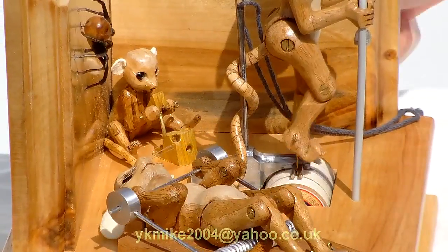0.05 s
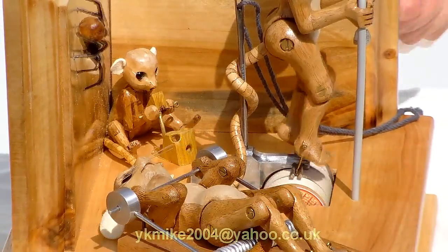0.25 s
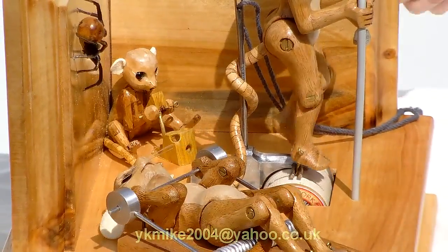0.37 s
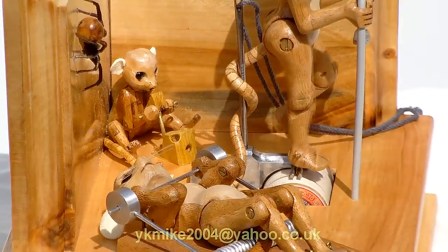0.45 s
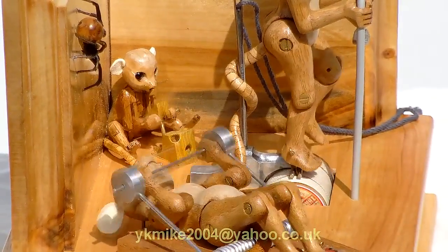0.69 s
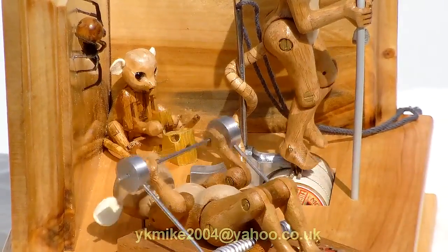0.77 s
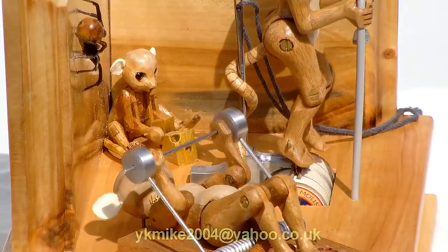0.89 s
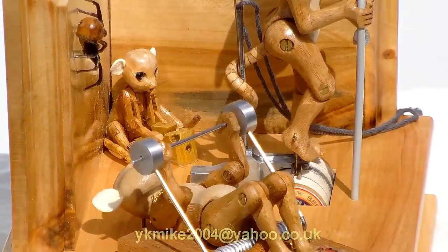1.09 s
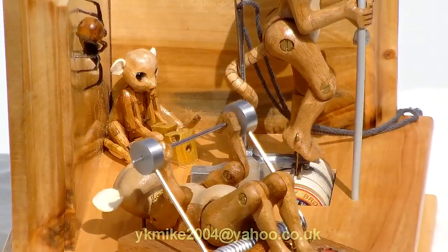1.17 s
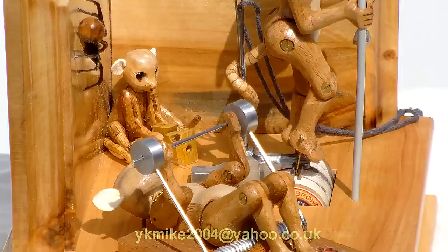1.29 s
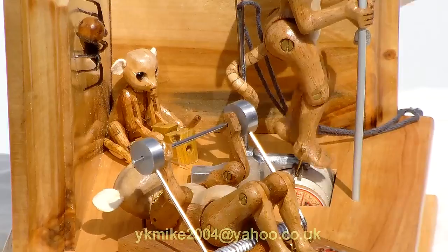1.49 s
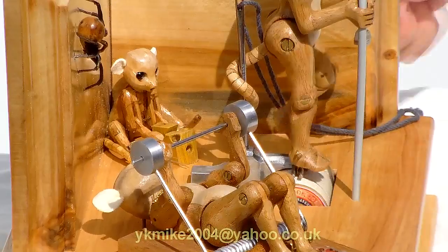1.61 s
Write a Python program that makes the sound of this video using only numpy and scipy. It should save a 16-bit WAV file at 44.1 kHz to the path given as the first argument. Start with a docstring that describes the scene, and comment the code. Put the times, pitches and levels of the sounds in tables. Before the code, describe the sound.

A small hand-cranked wooden automaton clicks and clacks unevenly, with soft wood rubbing, thin metallic pings and two brief rod rings; close microphone, small room, faint steady hiss.

```python
"""Wood rubs softly over a faint hiss, then the parts of a hand-cranked wooden automaton begin to click.
The rubbing is many tiny random slips; each click is a burst of noise split into ranges of pitch.
A thin ping recurs, a metal rod rings twice and small parts sound short notes, all made of sine waves.
A small room answers the clicks and notes with near reflections and short tails of fading noise."""
import sys
import numpy as np
from scipy import signal
from scipy.fft import rfft, irfft
from scipy.io import wavfile

SR = 44100
rng = np.random.default_rng(int(sys.argv[2]) if len(sys.argv) > 2 else 0)


def log_audio(samples):
    """Write samples as a 16-bit WAV file to the path given in sys.argv[1]."""
    # one column per channel
    frames = np.atleast_2d(samples).T
    # limit to full scale, then quantise
    limited = np.clip(frames, -1, 1)
    pcm = np.round(limited * 32767).astype(np.int16)
    wavfile.write(sys.argv[1], SR, pcm)


N = 72765  # length of the scene [samples]


def amp(db):
    """Turns decibels into a factor to multiply a sound by."""
    return 10 ** (np.asarray(db) / 20)


def evened(x):
    """Scales a sound to an average strength (rms) of 1."""
    return x / np.sqrt(np.mean(x ** 2) + 1e-20)


def read(points, hz):
    """Reads between the points of a table, with frequency on a logarithmic axis."""
    f, value = np.transpose(points)
    return np.interp(np.log(hz + 1), np.log(f + 1), value)


def add(mix, s, sound):
    """Mixes a sound in at time s, in seconds."""
    part = mix[max(round(s * SR), 0):][:len(sound)]
    part += sound[:len(part)]


def coloured(x, points):
    """Makes some pitches of a steady sound stronger than others, then evens it to rms 1."""
    gain = amp(read(points, np.fft.rfftfreq(N, 1 / SR)))
    return evened(irfft(rfft(x) * gain, N))


# Rubbing of cams and joints: (time [s], level [dB])
RUB = [(0, -73), (.10, -70), (.13, -65), (.20, -61), (.33, -70.5), (.45, -68.5), (.50, -68), (.58, -62.5),
       (.66, -64), (.80, -62), (.86, -70), (.92, -65), (1.10, -68.5), (1.24, -72.5), (1.33, -57.5),
       (1.38, -61.5), (1.46, -71.5), (1.65, -69)]
# Colour of the rubbing: (frequency [Hz], relative level [dB per Hz])
RUB_COLOUR = [(100, -35), (300, -21), (450, -6.5), (750, -4), (1300, -4.5), (2400, -4.5), (4500, -6.5),
              (6300, 0.5), (8000, -17), (15000, -33.5)]
# Low scraping of wood: (time [s], level [dB])
SCRAPE = [(0, -88), (.15, -80), (.25, -78.5), (.33, -82.5), (.56, -84), (.61, -71), (.69, -71), (.76, -75),
          (.82, -67), (.88, -78.5), (1.20, -90), (1.28, -90.5), (1.35, -69), (1.47, -87), (1.65, -84.5)]
# Colour of the scraping: (frequency [Hz], relative level [dB per Hz])
SCRAPE_COLOUR = [(60, -41), (150, -30), (240, -15), (320, -18.5), (400, -5.5), (620, 0), (800, -0.5),
                 (1200, -15), (3000, -37), (15000, -64)]
SLIPS_PER_S, SLIP_SPREAD_DB = 1500, 1.5  # average rate; how unequal the slips are


def rubbing(level, colour):
    """Wood slides on wood in tiny uneven slips, at random moments and in either direction."""
    sizes = amp(SLIP_SPREAD_DB * np.minimum(rng.exponential(1, N), 4))
    directions = rng.choice([-1., 1.], N)
    happens = rng.random(N) < SLIPS_PER_S / SR
    loudness = amp(np.interp(np.arange(N) / SR, *np.transpose(level)))
    return coloured(sizes * directions * happens, colour) * loudness


# Colour of the hiss: (frequency [Hz], relative level [dB])
HISS_COLOUR = [(25, -20), (60, -31.5), (110, -28), (170, -16.5), (240, -12.5), (400, -7), (650, -7.5),
               (1500, -6), (2800, -4), (5000, -7), (6200, -5.5), (8500, -7), (12500, -7.5), (15200, -2.5)]
HISS_DB = -67  # rms level


def hiss():
    """The faint steady background is random noise with a fixed colour."""
    return amp(HISS_DB) * coloured(rng.standard_normal(N), HISS_COLOUR)


# Parts meeting: (time [s], chatter decay [s], then the levels [dB] of knock, wood, clack, click, tick, snap)
CLICKS = [ (.0445, 0.0025, -66, -65.5, -82.5, -83, -81, -88),
          (.0535, 0.00037, -76.5, -82, -74, -61.5, -61.5, -67.5),
          (0.0925, 0.0006, -86, -71, -74, -67, -64, -82),
          (0.1258, 0.0028, -62, -60, -65, -64.5, -64.5, -73),
          (.1596, 0.0026, -65, -59.5, -66, -60, -65, -80), (0.1739, 0.0044, -64, -59.5, -67, -71, -68, -77),
          (0.191, 0.0029, -63, -67, -65.5, -57, -63, -81), (.2069, .0008, -56.5, -46, -39, -41, -30, -54),
          (.2238, 0.0018, -66, -52.5, -51, -46.5, -47, -63), (.2262, 0.0026, -55, -51, -49, -50, -46, -57),
          (0.2339, 0.0087, -52, -54, -60.5, -58, -55.5, -66), (.4780, 0.0038, -71, -64, -71, -77, -71, -89),
          (0.486, 0.0043, -76.5, -91, -68, -65, -60.5, -77),
          (0.5447, 0.0016, -83, -72, -71, -63, -61.5, -81),
          (0.5901, 0.0025, -63, -55, -61, -49, -41.5, -52),
          (0.6053, 0.014, -49, -56, -55.5, -50.5, -58.5, -81), (.6735, .007, -59, -56, -64, -71, -70, -80),
          (0.7118, .001, -61, -54, -59, -66, -67, -86), (.7330, 0.0037, -58.5, -56.5, -55, -62, -49, -75),
          (0.7362, 0.0011, -57, -48, -57.5, -55.5, -45.5, -79),
          (.7397, 0.0013, -55, -48, -52, -54.5, -49.5, -69),
          (.7580, 0.0016, -59.5, -61.5, -63, -55, -52, -64),
          (.8303, 0.0023, -66.5, -63, -69, -75, -72, -86), (0.9181, .001, -82, -85, -85, -67, -71, -93),
          (.9370, .001, -65.5, -64.5, -72, -77, -81, -87),
          (0.9446, 0.00097, -57, -49, -43.5, -48, -34, -62.5),
          (0.9616, .002, -72.5, -51.5, -63, -56, -53, -68), (.9930, 0.0015, -68, -65, -68, -73, -81, -90),
          (1.0352, 0.0017, -63, -50.5, -39, -44, -43, -56.5),
          (1.038, 0.0011, -67, -60, -49, -46.5, -41, -56),
          (1.2880, 0.021, -72.5, -76.5, -69, -64.5, -60.5, -70),
          (1.317, 0.0018, -60, -65.5, -55.5, -60, -60, -74),
          (1.3413, 0.0011, -71, -66.5, -58.5, -51, -47, -56.5),
          (1.3450, 0.0023, -60, -56.5, -54, -53, -48.5, -57.5),
          (1.4012, 0.0035, -61.5, -59.5, -69, -74, -74, -74),
          (1.5673, 0.0068, -65.5, -64.5, -71, -68, -65, -84),
          (1.637, 0.0075, -59.5, -57.5, -59.5, -56, -50, -72), ]
# Ranges in which the parts sound, knock to snap: (low edge [Hz], high edge [Hz])
BODY = [(1020, 1760), (2000, 3060), (3150, 4230), (4450, 5350), (5820, 6493), (6650, 7620)]
CONTACT_RISE_S = 0.00034
PUSH_DB, PUSH_HZ = -49.5, 60  # a soft low push of air, level against the clack
CRACK_DB, CRACK_HZ, CRACK_TOP_HZ = -8, 7800, 13000  # a broad crack, level against the snap


def clicks():
    """Each contact chatters briefly and rings the parts, its energy set as an rms level over 5 ms."""
    out, t = np.zeros(N), np.arange(2048) / SR
    window = .005 * SR
    bands = [signal.butter(2, np.sort(edges), "band", fs=SR, output="sos") for edges in BODY]
    bands.append(signal.butter(1, PUSH_HZ, fs=SR, output="sos"))
    bands.append(signal.butter(2, [CRACK_HZ, CRACK_TOP_HZ], "band", fs=SR, output="sos"))
    for s, decay, *levels in CLICKS:
        force = np.minimum(t / CONTACT_RISE_S, 1) * np.exp(-t / decay)
        noise = rng.standard_normal((len(bands), len(t)))
        spectrum = rfft(noise * force, 2 * len(t))
        # Equal force at every frequency
        chatter = irfft(spectrum / (abs(spectrum) + 1e-12))[:, :len(t)]
        clack, snap = levels[2], levels[-1]
        all_levels = levels + [clack + PUSH_DB, snap + CRACK_DB]
        for sos, grains, db in zip(bands, chatter, all_levels):
            ring = signal.sosfilt(sos, grains)
            add(out, s, amp(db) * ring * np.sqrt(window / np.sum(ring ** 2)))
    return out


# Time the room takes to fade by 60 dB: (frequency [Hz], t60 [s])
ROOM_T60 = [(400, 0.15), (1300, 0.29), (3500, 0.28), (6500, 0.2), (12000, 0.6)]
# Strength of the tail against the direct sound: (frequency [Hz], level [dB])
ROOM_GAIN = [(300, 1.5), (1300, -1.5), (2500, -3.5), (4000, -5.5), (6200, -5.5), (8000, -0.5), (14000, -12)]
# Early reflections: (delay [s], level [dB])
ECHOES = [(.0036, -12.5), (.0061, -43.5), (.0096, -28.5), (0.0163, -29), (0.0208, -22)]
ROOM_BUILD_S = 0.0038


def room(x):
    """A few near reflections join a tail of noise that fades at its own rate in each pitch range."""
    hz, t, z = signal.stft(rng.standard_normal(SR // 2), SR, nperseg=256)
    t60 = read(ROOM_T60, hz)[:, None]
    fade = amp(read(ROOM_GAIN, hz)[:, None] - 60 * t / t60)
    # A longer fade starts softer, so its total energy stays the same
    even_energy = np.sqrt(2 * np.log(1000) / (t60 * SR))
    tail = signal.istft(z * fade * even_energy, SR, nperseg=256)[1]
    tail = tail * np.minimum(np.arange(len(tail)) / SR / ROOM_BUILD_S, 1)
    for delay, db in ECHOES:
        add(tail, delay, amp([db]))
    return signal.fftconvolve(x, tail)[:N]


TAIL_TURN_S = .5  # time over which the tails trade places


def blended_room(x, count=3):
    """Blends several random room tails in turn, so that the fading is smoother and less alike."""
    turn = np.arange(N) / SR / TAIL_TURN_S
    answers = [room(x * np.cos(np.pi * (turn + k / count))) for k in range(count)]
    return sum(answers) * np.sqrt(2 / count)


# Thin pings: (time [s], level [dB])
PINGS = [(.062, -55.5), (0.361, -63), (0.431, -67), (.496, -55), (.991, -56), (1.162, -63), (1.230, -66),
         (1.397, -56), (1.462, -56), (1.56, -65), (1.629, -59)]
# Partials, the pure tones in a ping: (frequency [Hz], relative level [dB])
PING_TONE = [(2884, 1.5), (3842, -14), (5765, -24)]
PING_RISE_S, PING_T60_S, PING_LENGTH_S, PING_RELEASE_S = 0.0057, .11, .05, .024


def pings():
    """A thin tone swells quickly, fades and is damped."""
    out, t = np.zeros(N), np.arange(0, PING_LENGTH_S, 1 / SR)
    rise = np.minimum(t / PING_RISE_S, 1)
    damping = np.minimum((PING_LENGTH_S - t) / PING_RELEASE_S, 1)
    fade = amp(-60 * np.maximum(t - PING_RISE_S, 0) / PING_T60_S)
    tone = sum(amp(db) * np.sin(2 * np.pi * hz * t) for hz, db in PING_TONE)
    for s, db in PINGS:
        add(out, s, amp(db) * rise * damping * fade * tone)
    return out


# Blows that set a metal rod ringing: (time [s], level [dB])
ROD_BLOWS = [(0.2069, -52), (0.9452, -39)]
# Modes, the rod's own ways of vibrating: (frequency [Hz], relative level [dB], t60 [s])
ROD = [(5985, -3, 0.15), (6085, -1, .18), (6200, -9, .18), (6310, -8, .14)]
ROD_RISE_S = 0.0012


def rod():
    """A metal rod rings on after two blows, as a few close tones that each fade away."""
    out, t = np.zeros(N), np.arange(SR // 2) / SR
    ring = sum(amp(db - 60 * t / t60) * np.sin(2 * np.pi * hz * t) for hz, db, t60 in ROD)
    ring = ring * (1 - np.exp(-(t / ROD_RISE_S) ** 2))
    for s, db in ROD_BLOWS:
        add(out, s, amp(db) * ring / len(ROD))
    return out


# Small parts that sound one short note when struck: (time [s], frequency [Hz], level [dB], t60 [s])
NOTES = [(.2072, 4040, -36, .015), (.4785, 2950, -55, .02), (.5900, 2790, -47, .03),
         (.5905, 4780, -39, .016), (.7123, 2200, -46, .016), (.7366, 2190, -47, .03),
         (1.0355, 3500, -30, .008)]
NOTE_RISE_S = .0004


def notes():
    """Each small part rings for a few milliseconds at its own pitch."""
    out, t = np.zeros(N), np.arange(SR // 10) / SR
    rise = 1 - np.exp(-(t / NOTE_RISE_S) ** 2)
    for s, hz, db, t60 in NOTES:
        fade = amp(db - 60 * t / t60)
        add(out, s, fade * rise * np.sin(2 * np.pi * hz * t))
    return out


def scene():
    """Adds up the mechanism, the room's answer to its clicks and notes, and the hiss."""
    friction = rubbing(RUB, RUB_COLOUR) + rubbing(SCRAPE, SCRAPE_COLOUR)
    parts = clicks() + notes()
    mix = friction + hiss() + parts + blended_room(parts) + pings() + rod()
    return mix[None]


# Dips in the microphone's response: (frequency [Hz], width [Hz], level [dB])
MIC_DIPS = [(303, 34, -14), (900, 42, -13.5), (106, 48, -6.5)]
EDGE_HZ = 15400  # little is heard above this


def record(dry):
    """The microphone weakens a few low ranges, then a filter takes away the highest treble."""
    hz = np.fft.rfftfreq(2 * N, 1 / SR)
    dips = sum(db * np.exp(-((hz - centre) / width) ** 2) for centre, width, db in MIC_DIPS)
    heard = irfft(rfft(dry, 2 * N) * amp(dips), 2 * N)[:, :N]
    treble_cut = signal.firwin(511, EDGE_HZ, window=("kaiser", 9), fs=SR)
    return signal.oaconvolve(heard, treble_cut[None], "same")


dry = scene()
out = record(dry)
log_audio(out)
```